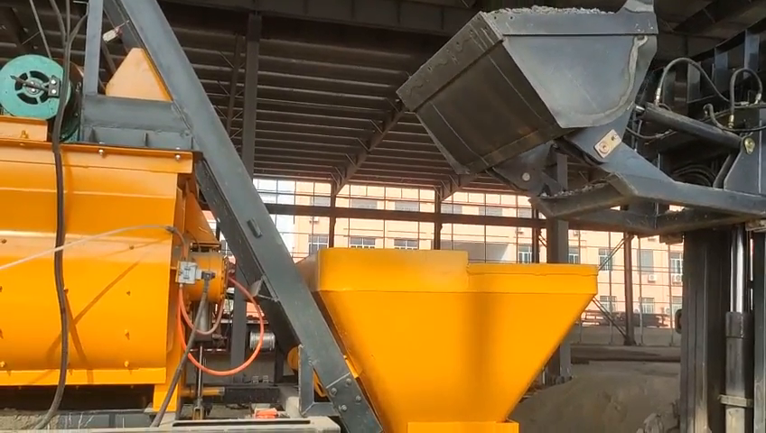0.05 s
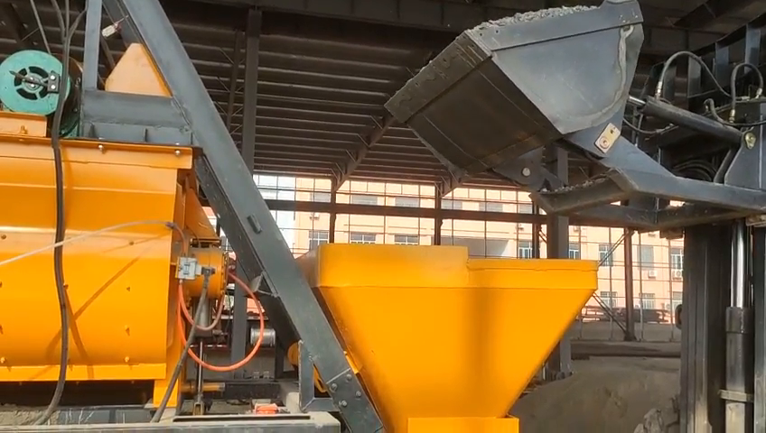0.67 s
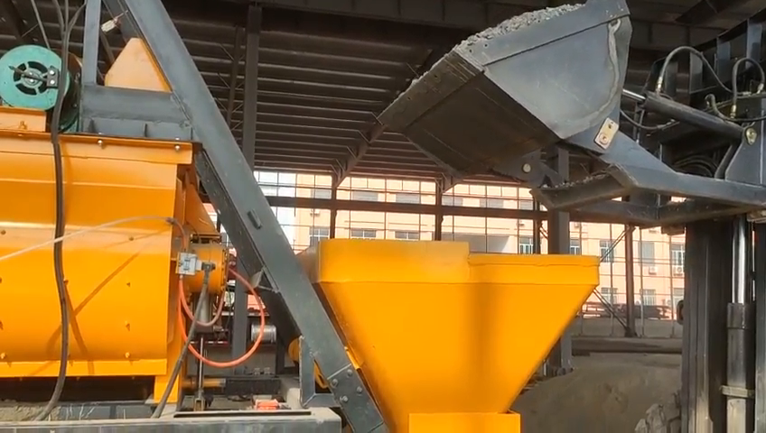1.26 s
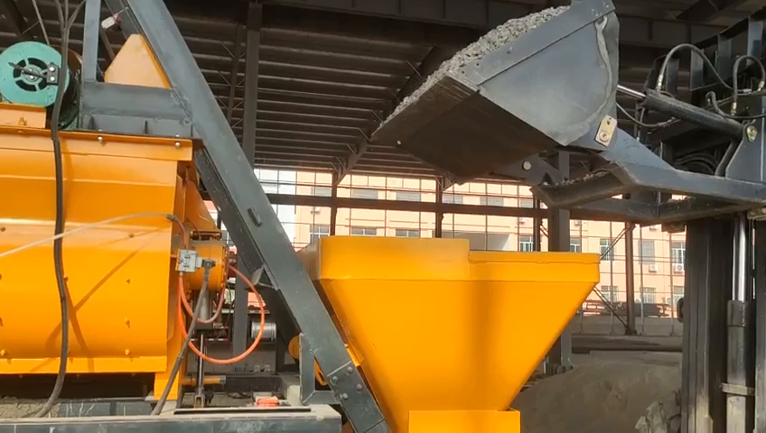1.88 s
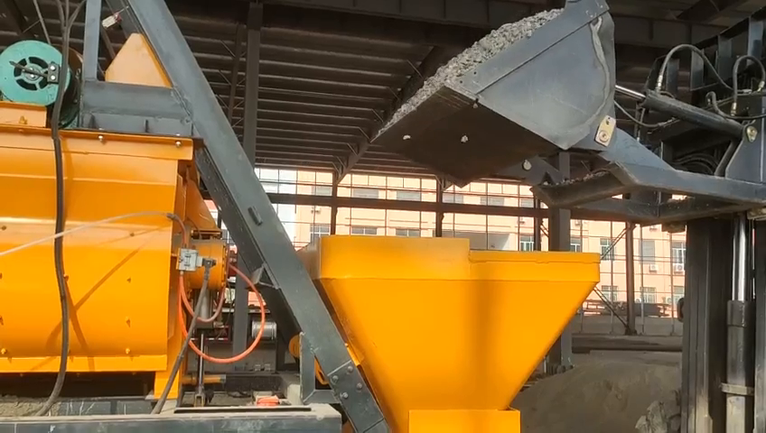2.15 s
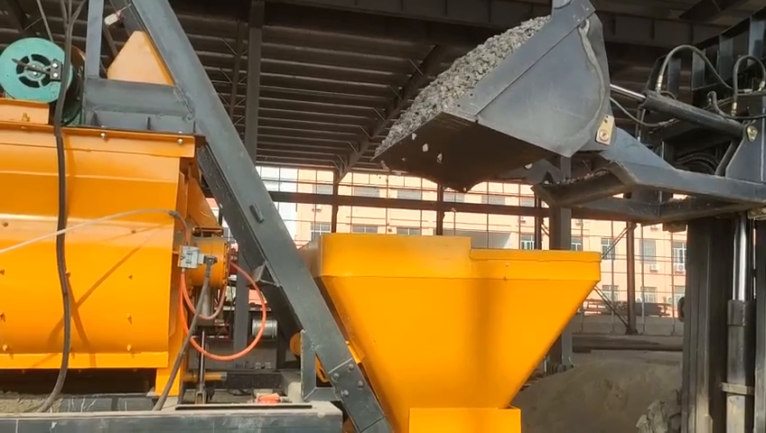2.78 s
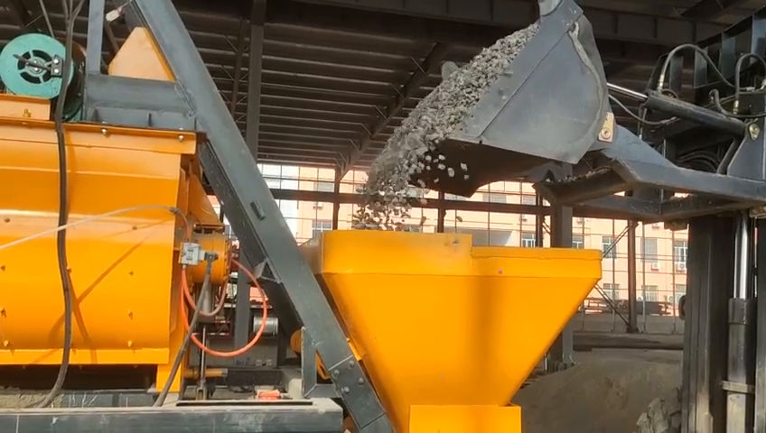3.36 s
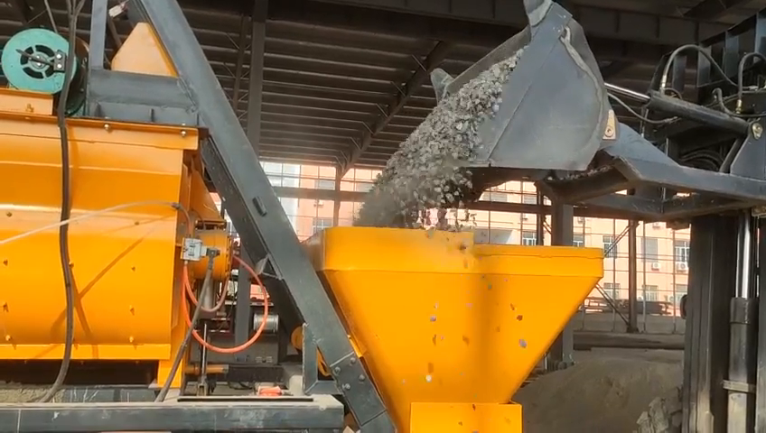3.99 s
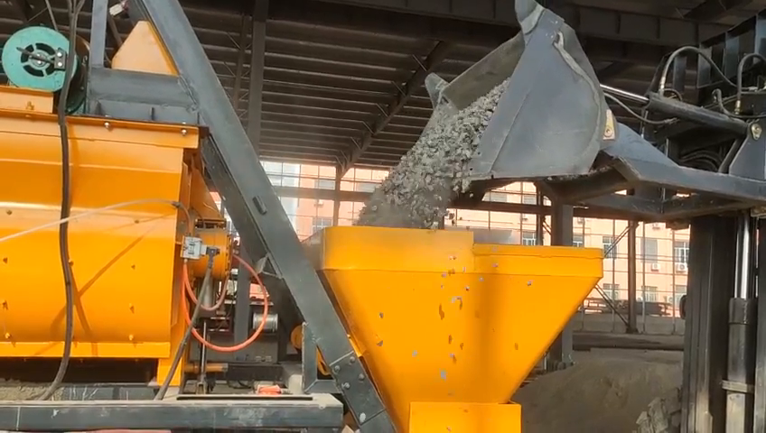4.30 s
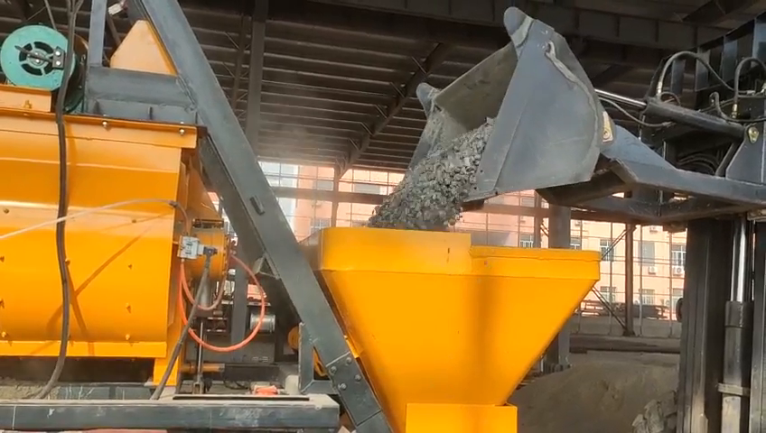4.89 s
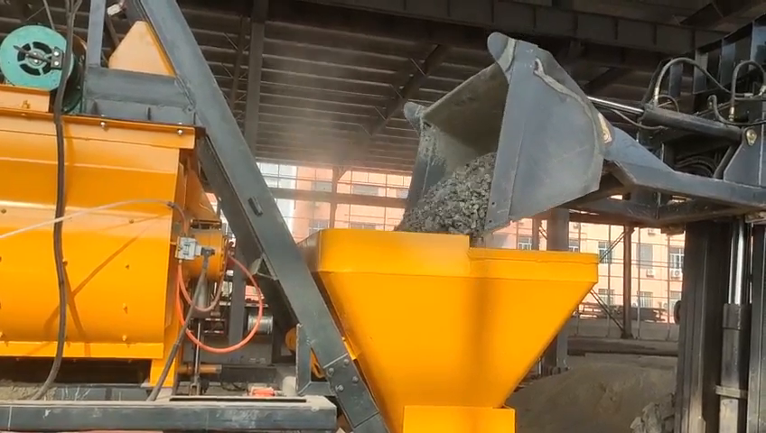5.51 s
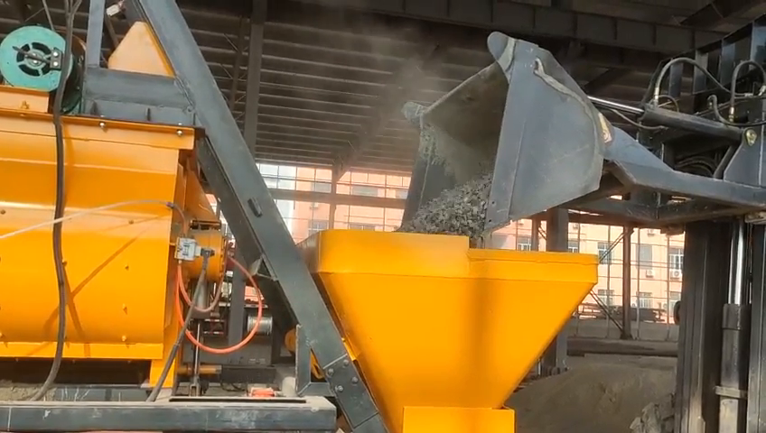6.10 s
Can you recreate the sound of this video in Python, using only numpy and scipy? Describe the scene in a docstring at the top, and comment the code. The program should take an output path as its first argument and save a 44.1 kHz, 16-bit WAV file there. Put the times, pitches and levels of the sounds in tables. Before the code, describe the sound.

A diesel loader rumbles steadily throughout, along with the wavering hum of a concrete mixer, in an open industrial shed with a short echo. Between about 0.8 and 2.4 seconds, hydraulic oil hisses in several brief spurts, slightly to the right. From about 2.1 seconds, single stones and small clumps drop into a steel hopper, a little to the left, with sharp cracks, clinks and a couple of small pings. At about 3.3 seconds the load gives way into a loud, dense stream of gravel that clatters, pounds dully and rings the steel. It peaks near 3.9 seconds, where the microphone turns everything down slightly. The stream eases and by 5 seconds thins to rattling clumps landing on the heap. A soft, deep thud comes at around 5.5 seconds, and scattered stones keep falling over the engine until just past 6 seconds.

```python
"""In an open industrial shed, a wheel loader tips gravel into a concrete mixer's steel hopper.
The diesel rumbles, the mixer hums and oil hisses through the loader's tilt valve throughout.
Single stones and clumps drop first. Then the load slides in a dense stream that clatters, rings
the steel and thins out on its own heap, which settles with a deep thud. The microphone's
automatic volume control turns everything down while the stream is loudest."""
import sys
import numpy as np
from scipy import signal
from scipy.fft import rfft, irfft
from scipy.io import wavfile
from scipy.ndimage import uniform_filter1d

SR = 44100
rng = np.random.default_rng(int(sys.argv[2]) if len(sys.argv) > 2 else 0)


def inscribe(sig):
    """Save sig as 16-bit PCM at rate SR to the path in sys.argv[1].

    A 1-D sig is mono; a 2-D sig holds one channel per row.
    Samples are clipped to [-1, 1] before scaling.
    """
    pcm = np.round(np.clip(np.atleast_2d(sig).T, -1, 1) * 32767)
    wavfile.write(sys.argv[1], SR, pcm.astype(np.int16))


N = 275625
TIME = np.arange(N) / SR
BIN_HZ = np.arange(N // 2 + 1) * SR / N
LOG_HZ = np.log(BIN_HZ + 1)
SIDES = np.array([[.5], [-.5]])  # splits a left-minus-right level between the ears

# a trickle grows, the load gives way and runs out, the rest creeps on: time_s, level_db
GRAVEL_FLOW = [(2.05, -45), (2.47, -35), (2.72, -24), (3.22, -21), (3.27, -10.5), (3.85, -0.5), (4.55, -5),
               (5.03, -11.5), (5.07, -17.5), (5.5, -19), (6.25, -24)]
POUR_START_S = GRAVEL_FLOW[0][0]
# stones that land together: start_s, level_db, hold_s, steel_vs_stone_db, pitch_hz
STONE_CLUMPS = [(2.171, -19.5, .011, -3, 4600), (2.284, -28.5, 0.11, -0.5, 2720),
                (2.494, -22.5, 0.02, -13, 4200), (2.542, -20, 0.013, -18, 6000),
                (2.606, -24.5, 0.025, -8, 4400), (2.71, -24, 0.014, -15, 5900),
                (2.75, -23, .012, -12, 4400), (2.798, -16.5, 0.019, -3, 2780),
                (2.902, -22, 0.056, -19, 3970), (3.011, -18, 0.01, 1, 3900), (3.072, -20.5, 0.01, -4, 5800),
                (3.112, -17, 0.023, 1.5, 3670), (3.228, -16, 0.022, -14, 5770),
                (3.384, -11, 0.024, -4, 3450), (3.475, -13, 0.032, 0, 3460),
                (4.748, -13.5, 0.027, -13, 4400), (5.006, -18, 0.046, -15, 4400),
                (5.138, -17.5, 0.025, -6, 3980), (5.217, -22, 0.12, -6, 3800),
                (5.343, -18.5, 0.029, -3, 4350), (5.398, -18.5, 0.031, -3.5, 4350),
                (5.53, -20.5, 0.029, -1, 4000), (5.612, -22, 0.086, -4, 4370), (5.772, -24, 0.08, -9, 4430),
                (5.94, -24.5, 0.065, -20, 3850), (6.122, -24.5, 0.047, -15, 3850)]
CLUMP_RISE_S, CLUMP_FADE_S = .0044, .024


def undb(db):
    """Turn decibels into a number to multiply by."""
    return np.exp(np.asarray(db) * np.log(10) / 20)


def unit(x):
    """Scale a sound to an average power of 1."""
    return x / np.sqrt(np.mean(x ** 2))


def together(levels):
    """The combined level of unrelated sounds: their powers add."""
    return np.sqrt(sum(level ** 2 for level in levels))


def curve(rows):
    """Join (time_s, value) rows by straight lines."""
    return np.interp(TIME, *np.transpose(rows))


def wander(per_s):
    """Drift by about 1 either way, reaching a new random value per_s times a second."""
    return np.interp(TIME * per_s, np.arange(400), rng.standard_normal(400))


def swell(start_s, db, rise_s, fade_s, hold_s=0):
    """A level that rises, holds and dies away."""
    age = TIME[:SR]
    shape = (1 - np.exp(-age / rise_s)) * np.exp(-np.maximum(age - hold_s, 0) / fade_s)
    return np.pad(undb(db) * shape / shape.max(), (int(start_s * SR), N))[:N]


def decay(age, ring_s):
    """A fade that falls 60 dB in ring_s seconds."""
    return np.exp(-np.log(1000) * age / ring_s)


def over_hz(points):
    """Join (pitch_hz, value) rows into a value for every frequency."""
    hz, value = np.transpose(points)
    return np.interp(LOG_HZ, np.log(hz), value)


def colour(x, points, amount=1):
    """Shape a sound's tone by (pitch_hz, level_db) rows."""
    return irfft(rfft(x) * undb(amount * over_hz(points)), N)


def lift(x, bands):
    """Raise or lower a few bands of pitch."""
    lift_db = sum(db * np.exp(-(2 * (BIN_HZ - hz) / width) ** 2) for hz, width, db in bands)
    return irfft(rfft(x) * undb(lift_db), N)


def band(x, hz, width_hz):
    """Keep the part of a sound around one pitch."""
    return signal.lfilter(*signal.iirpeak(hz, hz / width_hz, fs=SR), x)


def even(x):
    """Flatten the tone: so many stones together favour no pitch."""
    spectrum = rfft(x)
    nearby_power = uniform_filter1d(np.abs(spectrum) ** 2, N // 700, axis=-1)
    return unit(irfft(spectrum / np.sqrt(np.abs(nearby_power) + 1e-12), N))


def shifting(x, depth_db, per_s=16, bands=12):
    """Stones keep landing on new spots, so neighbouring pitch bands rise and fall on their own."""
    place = np.interp(LOG_HZ, np.log([700, 12000]), [0, bands - 1])
    spectrum = rfft(x)
    slices = (irfft(spectrum * np.maximum(1 - np.abs(place - k), 0), N) for k in range(bands))
    return unit(sum(part * undb(depth_db * wander(per_s)) for part in slices))


def tail(ring_s):
    """Dense dying echoes, different at each ear."""
    echoes = rng.standard_normal((2, SR)) * decay(TIME[:SR], ring_s)
    return (echoes / np.sqrt(np.sum(echoes ** 2) / 2))[:, :int(ring_s * SR) + 2]


def ring(x, response):
    """Give a sound an echo or ring, one for each ear."""
    return signal.oaconvolve(np.atleast_2d(x), response, axes=-1)[:, :N]


def ears(pair):
    """Blend two unrelated channels so that the bass is shared and the treble stays apart."""
    # how alike the two ears are in the shed: pitch_hz, likeness (0 to 1)
    likeness = [(130, 1), (280, 0.76), (610, 1), (1300, 0.25), (3000, 0.02), (14000, 0.02)]
    alike = over_hz(likeness)
    left, right = rfft(pair)
    shared, apart = (left + right) * np.sqrt(1 + alike), (left - right) * np.sqrt(1 - alike)
    return irfft(np.array([shared + apart, shared - apart]) / 2, N)


def blows(per_s, spread_db):
    """Random clicks of average power 1; more spread makes a few of them stand out."""
    at = np.flatnonzero(rng.random(N) < per_s / SR)
    chance = rng.uniform(-1, 1, N)[at]
    clicks = np.zeros(N)
    clicks[at] = np.sign(chance) * undb(spread_db * np.minimum(-np.log(np.abs(chance)), 4))
    return unit(clicks / np.sqrt(per_s))


def diesel(level_db=-29, firing_hz=36.3, knock=.84, scatter_db=2, left_delay_s=.0003):
    """Each firing throws a dull burst through the engine block, over smooth fan noise."""
    # the rumble of the machines: pitch_hz, level_db
    rumble_tone = [(15, -53), (24, -31), (35, -19), (57, -26), (76, -14), (102, -26.5), (155, -6),
                   (225, -9.5), (257, -6), (335, 0.5), (511, -11), (599, -4.5), (846, -8), (1970, -19),
                   (2250, -20), (2440, -20), (6000, -33), (14000, -48.5)]
    # peaks and hollows of the machine casings: pitch_hz, width_hz, lift_db
    casing_bands = [(435, 50, 2.5), (735, 50, 2.5), (850, 70, -3.5), (975, 60, -3), (1080, 50, 2),
                    (1170, 80, -2)]
    # the rumble's treble leans left: pitch_hz, left_minus_right_db
    balance = [(60, 0), (200, 1), (370, 0), (670, 0.5), (1220, 1), (2230, 8), (4000, 13), (6300, 16),
               (8000, 5), (14000, 10)]
    firings = np.cumsum(firing_hz * (1 + .0032 * wander(3.5))) / SR
    strength = undb(scatter_db * rng.standard_normal(1000))[firings.astype(int)]
    bursts = unit(1 + knock * strength * np.exp(-(firings % 1) / .63))
    fan = rng.standard_normal((2, N))
    knocks = colour(fan * (bursts - 1), [(1100, 0), (2200, -14)])
    rumble = lift(colour(ears(fan + knocks), rumble_tone), casing_bands)
    left, right = unit(rumble) * undb(level_db + .5 * wander(12))
    left = np.roll(left, int(left_delay_s * SR))
    return np.array([colour(left, balance, .5), colour(right, balance, -.5)])


def machine_hum(drift=.0017, flutter_rad=.7, waver_db=2.5, shake_db=2.2, pan_db=1.5):
    """Turning shafts and gears give wavering tones."""
    # tones of the diesel, the mixer drive and the oil pump: pitch_hz, level_db
    hum_tones = [(35.6, -72), (71, -64), (80, -61), (160, -48), (199.3, -44.5), (225.3, -39.5), (237, -47),
                 (327, -50.5), (343.5, -39.5), (586, -41), (615.5, -37.5), (652, -46), (910, -51),
                 (1045, -46), (1098, -49), (1443, -48), (2299, -44.5)]
    hum = 0
    for hz, db in hum_tones:
        # higher tones flutter more, and echoes set them further apart at the two ears
        height = min(hz / 700, 1.5)
        phase = 2 * np.pi * np.cumsum(hz * (1 + drift * wander(14))) / SR
        phase = phase + flutter_rad * height * wander(55) + np.array([[0], [height]])
        level = undb(db + waver_db / (1 + height) * wander(12))
        shake = unit(undb(shake_db * wander(60)))
        hum = hum + np.sqrt(2) * level * shake * np.sin(phase)
    return hum * undb(SIDES * pan_db)


def tilt_valve(leak_db=-43, rise_s=.014, fade_s=.066, left_db=-2):
    """Oil hisses through the loader's valve on the right, louder at each pull of the lever."""
    # pulls of the lever: start_s, level_db, hold_s
    lever_pulls = [(0.814, -37.5, 0.34), (1.003, -32.5, 0.046), (1.216, -37.5, 0.051), (1.678, -35.5, .08),
                   (1.843, -40.5, 0.53)]
    # the hiss of the oil: pitch_hz, level_db
    hiss_tone = [(800, -1), (2000, 2.5), (2650, 2), (2920, 11.5), (3270, -3), (3700, 2.5), (6000, -1.5),
                 (7500, -15), (14000, -28)]
    source = rng.standard_normal(N)
    direct = np.array([np.roll(source, 20), source])  # reaches the left ear a little later
    hiss = unit(colour(.39 * direct + rng.standard_normal((2, N)), hiss_tone))
    pulls = [swell(start_s, db, rise_s, fade_s, hold_s) for start_s, db, hold_s in lever_pulls]
    level = together([undb(leak_db)] + pulls) * undb(1.1 * wander(14))
    return hiss * level * undb([[left_db], [0]])


def pour_levels(bare_steel_db=-.5, muffle_db_per_s=4.5, clump_pound_db=-9.5):
    """How hard the slide and its clumps strike stone, bare steel and the loaded hopper."""
    slide_db, age = curve(GRAVEL_FLOW), TIME - POUR_START_S
    slide = undb(slide_db) * (age > 0)
    clumps = [swell(start_s, db, CLUMP_RISE_S, CLUMP_FADE_S, hold_s)
              for start_s, db, hold_s, _, _ in STONE_CLUMPS]
    on_stone = together([slide] + clumps)
    clumps_on_steel = together([clump * undb(row[3]) for clump, row in zip(clumps, STONE_CLUMPS)])
    # the growing heap muffles the steel
    on_steel = together([slide * undb(bare_steel_db - muffle_db_per_s * age), clumps_on_steel])
    pound_share = undb(-16 - .2148 * slide_db)  # falls as the stream thickens
    on_heap = together([slide * pound_share, clumps_on_steel * undb(clump_pound_db)])
    return np.array([on_stone, on_steel, on_heap])


def clatter(flow, blows_per_s=1350, sizes=11, clack_s=.035, clack_db=2, sand_db=-13):
    """Stone hits stone, each size at its own pitch; a stronger flow means more blows."""
    # stone on stone: pitch_hz, level_db
    stone_tone = [(40, -60), (150, -39), (350, -17.5), (650, -15), (1000, -11.5), (1700, -8), (2200, -3),
                  (2800, 0.5), (3400, -1.5), (3900, 3.6), (5000, 0.5), (6400, -4), (7300, -10),
                  (10000, -15), (14000, -22)]
    # pitches that the funnel boosts or softens: pitch_hz, width_hz, lift_db
    funnel_bands = [(2250, 400, .7), (2750, 450, .5), (4250, 600, -.6), (5750, 950, 2.6), (6400, 550, 2)]
    hits = 0
    for hz in np.geomspace(1500, 11000, sizes):
        clicks = blows(blows_per_s * (flow + .07), spread_db=0)
        clack = undb(clack_db) * tail(clack_s)
        clack[[0, 1], rng.integers(0, 24, size=2)] += 1  # the tick of first contact
        hits = hits + ring(clicks, band(clack, hz, width_hz=hz))
    sand = undb(sand_db) * rng.standard_normal((2, N))
    stream = colour(ears(even(hits) + sand), stone_tone)
    return shifting(lift(stream, funnel_bands), depth_db=1.1)


def clinks(count=230, level_db=-6, spread_db=4, low_hz=1500, high_hz=6500, ring_s=.09):
    """Coarse stones glance off the steel and clink briefly, each at its own pitch."""
    out, age = np.zeros((2, N + SR)), TIME[:SR // 6]
    for when, pitch, size, side, lag in rng.random((count, 5)):
        start = int(np.interp(when, [0, 1], [POUR_START_S * SR, N]))
        hz = low_hz + pitch * (high_hz - low_hz)
        tone = np.sin(2 * np.pi * (hz * age + np.array([[0], [lag]])))
        clink = tone * decay(age, ring_s) * undb(level_db + spread_db * (2 * size - 1))
        out[:, start:start + len(age)] += np.sqrt(2 * np.array([[side], [1 - side]])) * clink
    return out[:, :N]


def crack(hz, width_hz=2200, crack_s=.01, ring_db=-6, ring_s=.09):
    """One hard stone hits: a sharp crack around its own pitch, then a brief ring."""
    # the crack of a hard stone: pitch_hz, level_db
    crack_tone = [(500, -10), (2500, 2), (4000, 4), (6300, 3), (7500, -7), (11000, -1), (14000, -1.5)]
    length = SR // 8
    snap, after_ring = (np.pad(tail(s)[0], (0, SR))[:length] for s in (crack_s, ring_s))
    burst = np.roll(band(snap + undb(ring_db) * after_ring, hz, width_hz), 20)
    tone_db = np.interp(np.fft.rfftfreq(length, 1 / SR), *np.transpose(crack_tone))
    hit = irfft(rfft(burst) * undb(tone_db), length)
    return hit / np.abs(hit).max()


def loose_stones(count=100, level_db=-5, spread_db=3, low_hz=2800, high_hz=6500):
    """Stones bounce clear at random, each with its own pitch, strength and side."""
    out = np.zeros((2, N + SR))
    for when, pitch, size, side in rng.random((count, 4)):
        start = int(np.interp(when, [0, 1], [POUR_START_S * SR, N]))
        hit = crack(low_hz * (high_hz / low_hz) ** pitch) * undb(level_db + spread_db * (2 * size - 1))
        out[:, start:start + len(hit)] += np.sqrt(2 * np.array([[side], [1 - side]])) * hit
    return out[:, :N]


def steel_clang(on_steel, level_db=-2):
    """The stream drums on bare steel; late in the pour it strikes one sheet that sings."""
    # stone on steel sheet: pitch_hz, level_db
    steel_tone = [(300, -42), (740, 4), (1100, -4.5), (1700, -2), (2200, 5.5), (2700, 0), (3500, 0.5),
                  (4500, 0), (7000, -12), (14000, -41)]
    drumming = ears(even(ring(blows(per_s=2500, spread_db=1.4), tail(.018))))
    clang = shifting(colour(drumming, steel_tone), depth_db=3) * on_steel * undb(level_db)
    singing = unit(band(drumming, hz=2680, width_hz=260))
    return clang + singing * swell(start_s=4.25, db=-22, rise_s=.12, fade_s=.04, hold_s=.72)


def pounding():
    """Soft, heavy blows land dully on the loaded hopper."""
    # the hopper under its load: pitch_hz, level_db
    heap_tone = [(30, -45), (60, -38), (160, -15), (350, -6.5), (500, -3.5), (740, 2.5), (950, -1.5),
                 (1500, -2), (3000, -23)]
    knocks = ears(even(ring(blows(per_s=900, spread_db=.51), tail(.03))))
    return unit(colour(knocks, heap_tone))


def hopper_wall(hits, level_db=-13):
    """The struck steel walls ring on faintly at their own pitches."""
    # the notes of the walls: pitch_hz, level_db, ring_s
    wall_notes = [(1228, 9, .5), (1480, 3, .25), (1650, 3, .3), (2090, 0, .25), (2152, 0, .25),
                  (2502, 1, .25), (2683, -1, .3), (2944, -2, .25), (3407, 3, .3), (4095, -3, .25),
                  (4484, 0, .3), (5330, -1, .25), (5745, 0, .2), (6100, 1, .25)]
    age = TIME[:SR // 2]
    phases = rng.uniform(0, 2 * np.pi, (len(wall_notes), 2, 1))
    response = sum(undb(db) * decay(age, ring_s) * np.sin(2 * np.pi * hz * age + phase)
                   for (hz, db, ring_s), phase in zip(wall_notes, phases))
    return unit(ring(hits, response)) * np.std(hits) * undb(level_db)


def clump_rings(ring_db=-8.5, width_hz=350):
    """Each clump rings around a pitch set by its stones and the spot where it lands."""
    rattle = even(ring(blows(per_s=1500, spread_db=1.5), tail(.012)))
    rings = 0
    for start_s, db, hold_s, _, hz in STONE_CLUMPS:
        level = swell(start_s, db + ring_db, CLUMP_RISE_S, CLUMP_FADE_S, hold_s)
        rings = rings + unit(band(rattle, hz, width_hz)) * level
    return colour(rings, [(6000, 3.5), (8000, -22)])


def hard_stones():
    """Lone hard stones crack out above the pour."""
    # where each stone falls in the pour: start_s, level_db, pitch_hz
    stone_hits = [(2.180, -16, 4400), (2.291, -18, 4400), (2.490, -7.5, 4400), (2.550, -14, 6300),
                  (2.608, -15, 4400), (2.714, -12, 5900), (2.757, -12, 4400), (2.867, -9.5, 5700),
                  (3.070, -1.5, 5700), (3.254, -4, 4400), (3.347, -2, 5800), (3.395, -1, 4400),
                  (3.493, -1, 4400), (5.360, -5, 4400), (5.805, -11, 5900), (5.851, -8, 3800),
                  (5.938, -11, 3800), (6.136, -12, 3800)]
    return sum(np.pad(undb(db) * crack(hz), (int(start_s * SR), N))[:N]
               for start_s, db, hz in stone_hits)


def thumps(width_hz=1300, rise_s=.008, fade_s=.012):
    """Heavy lumps thud, each around the pitch of the panel that it hits."""
    # lumps that hit the hopper: start_s, level_db, hold_s, pitch_hz
    lumps = [(2.295, -30, .05, 1200), (3.125, -27, .02, 720), (3.275, -24, .03, 1400),
             (3.485, -19, .025, 1450), (5.414, -22, 0.03, 640), (5.563, -27, .018, 1900)]
    knocks = ears(even(ring(blows(per_s=900, spread_db=1.2), tail(.02))))
    out = 0
    for start_s, db, hold_s, hz in lumps:
        thud = unit(band(band(knocks, hz, width_hz), hz, width_hz))
        out = out + thud * swell(start_s, db, rise_s, fade_s, hold_s)
    return out


def pings():
    """A stone hits one sheet squarely and it rings with a single pure note."""
    # square blows on the steel: start_s, pitch_hz, level_db, ring_s
    square_hits = [(2.364, 2810, -24, 0.2), (3.017, 1290, -22, 0.17)]
    out = 0
    for start_s, hz, db, ring_s in square_hits:
        age = np.maximum(TIME - start_s, 0)
        out = out + undb(db) * decay(age, ring_s) * np.sin(2 * np.pi * hz * age)
    return out


def gravel_pour(level_db=-1, surge_db=.7, hopper_pan_db=-3, echo_db=-11, echo_s=.73):
    """Clattering stones, ringing steel and dull pounding, all echoed by the shed."""
    # the stream lands left when thin, near the middle when full: time_s, left_minus_right_db
    landing_side = [(2.1, 5.5), (3.1, 4), (3.5, -1), (4.9, -2.5), (5.3, 5)]
    flow, on_steel, on_heap = pour_levels() * undb(surge_db * wander(30))
    stones = (clatter(flow) + clinks()) * flow
    stones += loose_stones() * flow ** .8  # these stand out more from a trickle than a full stream
    stones += clump_rings() + hard_stones()
    clang = steel_clang(on_steel)
    thuds = pounding() * on_heap + thumps()
    walls = hopper_wall((stones + clang) * np.sqrt(flow / flow.max()))
    direct = stones + (clang + thuds) * undb(SIDES * hopper_pan_db) + walls + pings()
    heard = direct + undb(echo_db) * ring(direct, tail(echo_s))
    pan = undb(SIDES * curve(landing_side))
    return heard * pan / np.sqrt(np.mean(pan ** 2, axis=0)) * undb(level_db)


def settling_heap():
    """The hopper's frame shudders with a deep thud as the heap settles."""
    # the thud: start_s, level_db, rise_s, fade_s
    thud = (5.46, -45, .05, .07)
    # the shaking frame: pitch_hz, level_db
    frame_tone = [(15, -13), (35, 8), (60, -10), (120, -7), (400, -50), (2000, -96)]
    return unit(colour(rng.standard_normal(N), frame_tone)) * swell(*thud)


def scene():
    """Gravel pours over the steady sound of the machines."""
    return gravel_pour() + settling_heap() + diesel() + machine_hum() + tilt_valve()


def record(dry, ceiling_db=-13.5, ratio=10, window_s=.16, top_hz=14100):
    """The microphone turns loud moments down, rounds off peaks and cuts the highest treble."""
    # the left microphone opening boosts one band and dulls those above: pitch_hz, level_db
    left_opening = [(5000, 0.5), (6300, 5.5), (7000, 1), (7700, -8), (10000, -7), (14000, -6)]
    sound = np.array([colour(dry[0], left_opening), dry[1]])
    power = np.mean(sound ** 2, axis=0)
    loudness = np.sqrt(np.abs(uniform_filter1d(power, int(window_s * SR))))
    held_down = sound * np.maximum(loudness / undb(ceiling_db), 1) ** (1 / ratio - 1)
    rounded = held_down / (1 + (held_down / .95) ** 4) ** .25
    return signal.sosfilt(signal.ellip(12, .2, 80, top_hz, fs=SR, output="sos"), rounded)


dry = scene()
out = record(dry)
inscribe(out)
```